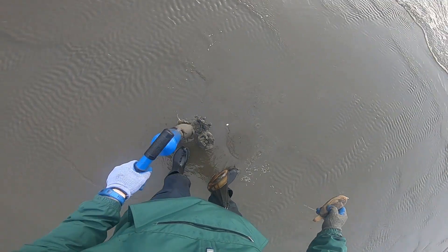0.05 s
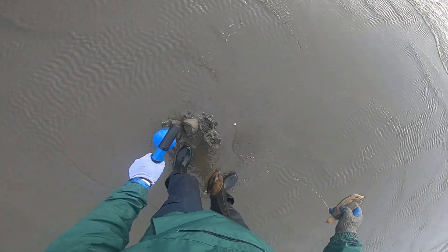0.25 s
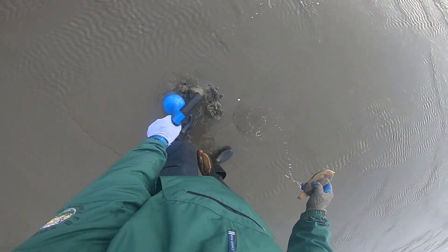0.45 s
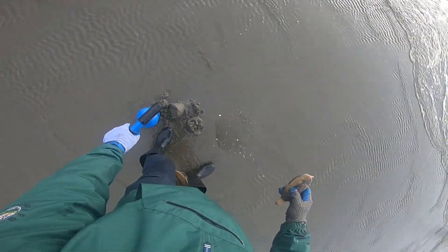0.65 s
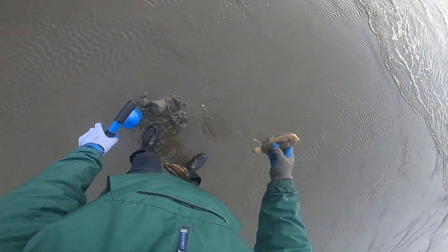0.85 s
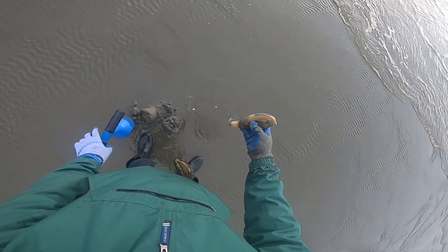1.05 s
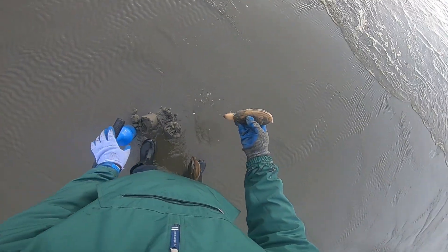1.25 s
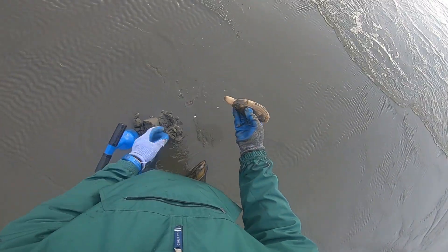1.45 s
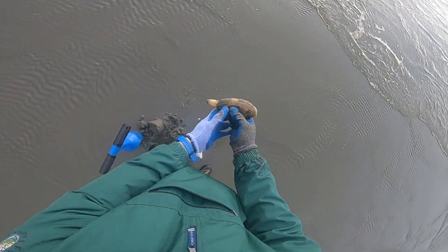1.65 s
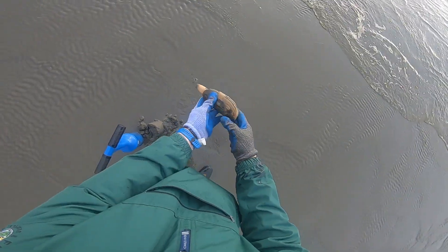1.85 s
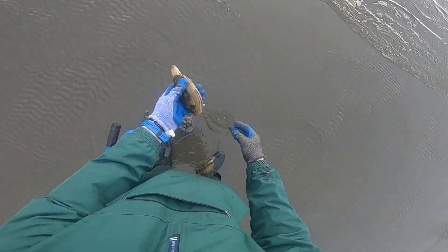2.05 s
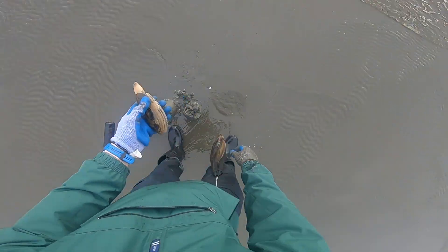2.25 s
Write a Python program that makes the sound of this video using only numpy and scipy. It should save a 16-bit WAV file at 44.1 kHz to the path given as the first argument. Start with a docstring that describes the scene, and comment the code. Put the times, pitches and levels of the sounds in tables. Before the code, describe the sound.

Wet sand squelches close by as a sleeve swishes, with dull bumps and wind buffeting the chest-worn microphone. A few drops tick and plop, then gloves and a sleeve rub softly, while faint surf washes along the beach.

```python
"""Wet sand squelches in swells of tiny pops as a clam digger sets down a tool, an arm's length away.
Tool and shell knock softly, gloves rub as a clam passes from hand to hand, and drops tick and plop.
A sleeve swishes close by, the harness bumps, air buffets the microphone and surf washes behind.
The stereo microphone sits in a chest-worn camera, whose housing rings with sand, knocks, cloth and surf."""
import sys
import numpy as np
from scipy.fft import rfft, irfft
from scipy.io import wavfile
from scipy.ndimage import uniform_filter1d

SR = 44100
rng = np.random.default_rng(int(sys.argv[2]) if len(sys.argv) > 2 else 0)


def waveform_to_disk(signal):
    """Save audio, clipped to [-1, 1], as 16-bit WAV at the path in sys.argv[1]."""
    frames = np.transpose(np.atleast_2d(signal))
    scaled = np.clip(frames, -1, 1) * 32767
    samples = np.round(scaled).astype(np.int16)
    wavfile.write(sys.argv[1], SR, samples)


N = 101429
T = np.arange(N) / SR
HZ = np.maximum(np.fft.rfftfreq(N, 1 / SR), 1)


def from_db(db):
    """Decibels to gain."""
    return 10 ** (np.asarray(db) / 20)


def unit_power(x):
    """Scale to a mean square of 1."""
    return x / np.sqrt(np.mean(x ** 2) + 1e-20)


def level(points):
    """Gain along a (time [s], level [dB]) curve."""
    return from_db(np.interp(T, *np.transpose(points)))


def hump(peak_s, db, width_s):
    """A bell-shaped rise and fall."""
    return from_db(db) * np.exp(-((T - peak_s) / width_s) ** 2 / 2)


def colour(points):
    """Gain along a (frequency [Hz], level [dB]) curve."""
    hz, db = np.transpose(points)
    return from_db(np.interp(np.log(HZ), np.log(hz), db))


def band(hz, width_hz):
    """Gain of one soft band around a pitch."""
    return 1 / (1 + (2 * (HZ - hz) / width_hz) ** 2)


def filtered(x, gain):
    """Apply a gain per frequency."""
    return irfft(rfft(x) * gain, N)


def drift(rate_hz):
    """Slow random wander of unit power."""
    return unit_power(filtered(rng.standard_normal(N), 1 / (1 + (HZ / rate_hz) ** 2)))


def stereo(mid, side, pan_db):
    """Left and right from mid and side; positive pan leans left."""
    return np.array([(mid + side) * from_db(pan_db / 2), (mid - side) * from_db(-pan_db / 2)])


def grains(per_s, spread_db, hiss):
    """Two rows of random tiny clicks over a smooth hiss."""
    sizes = from_db(spread_db * np.minimum(rng.exponential(1, (2, N)), 4))
    clicks = sizes * rng.choice([-1, 1], (2, N)) * (rng.random((2, N)) < per_s / SR)
    return unit_power(unit_power(clicks) + hiss * rng.standard_normal((2, N)))


def rumble(spectrum, side_db, pan_db, even_s=0.056):
    """Low stereo noise of even power."""
    mid, side = filtered(rng.standard_normal((2, N)), colour(spectrum))
    noise = stereo(mid, from_db(side_db) * side, pan_db)
    power = np.mean(noise ** 2, axis=0)
    for _ in range(2):
        power = uniform_filter1d(power, int(even_s * SR))
    return noise / np.sqrt(power)


# Peaks and dips of the housing around the microphone: (frequency [Hz], width [Hz], boost [dB])
HOUSING_MODES = [(822, 226, 11), (1317, 250, 6), (1602, 94, 11.5), (1854, 170, -1), (2160, 180, 3),
                 (2883, 176, 6.5), (3290, 366, 6), (4350, 400, -1.5), (5280, 180, 2), (5600, 480, -0.5),
                 (6470, 680, 4)]
def housing(extra_modes):
    """The camera's shell responds as a chain of resonances."""
    response = 1
    for hz, width_hz, db in [*HOUSING_MODES, *extra_modes]:
        resonance = 1 / (1 + 1j * (HZ ** 2 - hz ** 2) / (HZ * width_hz))
        response = response * (1 + (from_db(db) - 1) * resonance)
    return response


def through_housing(texture, mid_points, side_points, pan_points, lock, extra_modes=()):
    """Colour a texture by source and housing; lock is the side's power share in quadrature with the mid."""
    shell = housing(extra_modes)
    mid_gain, side_gain = colour(mid_points) * shell, colour(side_points) * shell
    mid, diffuse = rfft(texture)
    side = 1j * np.sqrt(lock) * mid + np.sqrt(1 - lock) * diffuse
    channels = stereo(mid * mid_gain, side * side_gain, 20 * np.log10(colour(pan_points)))
    return irfft(channels, N) / np.sqrt(np.mean(abs(mid_gain) ** 2 + abs(side_gain) ** 2))


# Surf, off across the sand: (time [s], level [dB])
SURF_LEVEL = [(0, -56), (.5, -60.5), (.9, -59), (1.3, -59), (1.7, -58.5), (2.05, -57.5), (2.3, -56.5)]
# Its mid, side and left-minus-right spectra: (frequency [Hz], relative level [dB])
SURF_MID = [(40, -10), (100, -8.5), (170, -2), (300, -11.5), (550, -21.5), (1100, -23.5), (1500, -12.5),
            (2000, -22.5), (3000, -23.5), (4000, -27.5), (6200, -30), (8000, -29.5), (12000, -33),
            (15500, -44)]
SURF_SIDE = [(40, -1), (170, -2.5), (300, -7), (520, -12.5), (750, -11), (1100, -12.5), (1500, -11),
             (2100, -24), (3000, -15.5), (4000, -25.5), (6000, -30.5), (9000, -93), (15000, -40)]
SURF_PAN = [(100, -9), (250, -1.5), (950, -1), (1450, 5), (2100, 0.5), (3200, 1), (6000, 0.5)]
def surf(flutter_db=1.0):
    """Small waves wash steadily in the distance."""
    wash = rng.standard_normal((2, N)) * level(SURF_LEVEL) * from_db(flutter_db * drift(25))
    return through_housing(wash, SURF_MID, SURF_SIDE, SURF_PAN, lock=0.26)


# Air right on the microphone: (time [s], relative level [dB])
WIND_LEVEL = [(0, -50), (.06, -67), (.12, -57.5), (.17, -45), (.225, -40.5), (.272, -17.5), (.31, -34.5),
              (.345, -23.5), (.385, -24.5), (.43, -26), (.48, -43.5), (.53, -50), (.575, -38.5),
              (.635, -36), (.69, -55.5), (.76, -36), (.82, -51), (.89, -53), (.95, -61), (1.06, -63.5),
              (1.11, -49), (1.18, -48), (1.22, -62), (1.5, -61.5), (1.55, -53), (1.62, -65.5),
              (1.76, -60.5), (1.8, -50), (1.86, -43), (1.92, -55.5), (1.97, -51), (2.02, -38.5),
              (2.1, -49.5), (2.16, -57.5), (2.26, -38), (2.3, -47.5)]
# Its rumble: (frequency [Hz], relative level [dB])
WIND_SPECTRUM = [(12, -1), (24, 7.5), (38, -3.5), (64, -5), (78, -27.5), (120, -40), (170, -42.5),
                 (300, -56), (700, -99)]
def wind(gain_db=1.5):
    """Air buffets the microphone in low lumps of pressure as the body moves."""
    gusts = uniform_filter1d(level(WIND_LEVEL), size=400) * from_db(gain_db)
    return rumble(WIND_SPECTRUM, side_db=-8, pan_db=-2) * gusts


# Bumps at the camera mount: (peak time [s], level [dB], width [s])
HARNESS_BUMPS = [(.243, -47, 0.0063), (0.296, -35.5, 0.014), (.347, -37.5, 0.0093), (0.384, -28, .011),
                 (.455, -46, 0.019), (.53, -63, 0.028), (.605, -59, 0.016), (1.15, -63, 0.0059),
                 (1.856, -56.5, 0.01), (1.99, -66, 0.02), (2.265, -54.5, 0.027)]
# Their thud: (frequency [Hz], relative level [dB])
BUMP_SPECTRUM = [(40, 0), (70, 10.5), (100, -3.5), (125, 5.5), (170, -23.5), (260, -25.5), (400, -27),
                 (800, -71)]
def harness_bumps():
    """The body bumps dully against the camera harness."""
    return rumble(BUMP_SPECTRUM, side_db=-2, pan_db=-8) * sum(hump(*row) for row in HARNESS_BUMPS)


def fibres(catch_db=0.85):
    """Threads of cloth catch and slip."""
    return grains(per_s=4000, spread_db=0, hiss=1.6) * from_db(catch_db * drift(66))


# Sleeve on the chest, beside the microphone: (time [s], level [dB])
RUB_LEVEL = [(0, -72.5), (.2, -70), (.5, -65.5), (.64, -71.5), (.72, -77.5), (1.38, -81), (1.5, -70),
             (1.6, -64.5), (1.72, -63), (1.92, -61), (2.0, -64.5), (2.07, -76), (2.3, -77)]
# Its mid, side and left-minus-right spectra: (frequency [Hz], relative level [dB])
RUB_MID = [(500, -26), (1500, 4.5), (2500, -5), (4000, -2), (6300, 4.5), (8000, 0), (10000, -7),
           (14000, -33)]
RUB_SIDE = [(500, 0), (1500, 5.5), (3000, 1), (4500, 0), (6300, -0.5), (8000, -48), (14000, -40)]
RUB_PAN = [(1000, 3.5), (1500, 2.5), (4200, -1.5), (5900, 7.5), (7500, -2.5), (12000, 3.5)]
# Ring of the lightly rubbed housing: (frequency [Hz], width [Hz], boost [dB])
RUBBED_MODES = [(5250, 220, 2.5), (8140, 2300, 0.5)]
# Notes of the sliding weave: (peak time [s], pitch [Hz], bandwidth [Hz], level [dB], width [s])
WEAVE_NOTES = [(1.715, 8000, 2200, -75, 0.065), (1.855, 6300, 380, -72, .07)]
def sleeve_rub():
    """The arm crosses the chest in a long light rub; the weave sings airily, then in a thin zip."""
    friction = fibres() * level(RUB_LEVEL)
    rub = through_housing(friction, RUB_MID, RUB_SIDE, RUB_PAN, lock=0, extra_modes=RUBBED_MODES)
    for peak_s, hz, width_hz, db, width_s in WEAVE_NOTES:
        mid, side = filtered(fibres(), band(hz, width_hz))
        note = unit_power(stereo(mid, from_db(-11) * side, pan_db=5))
        rub += note * hump(peak_s, db, width_s)
    return rub


# Sleeve brushing past the microphone: (time [s], level before dulling [dB])
SWISH_LEVEL = [(0, -86), (.2, -82), (.252, -56), (.263, -50.5), (.285, -45.5), (.345, -49.5), (.395, -51),
               (.43, -69), (.6, -59), (.7, -82), (.85, -81)]
# Its mid, side and left-minus-right spectra: (frequency [Hz], relative level [dB])
SWISH_MID = [(150, -22), (500, -22), (950, -13.5), (1300, -3), (1700, -6.5), (2500, -12.5), (4000, -12),
             (7000, -9), (10000, -17), (12000, -31), (14000, -51)]
SWISH_SIDE = [(150, 15.5), (500, -11), (950, -12), (1300, 3.5), (1700, -10), (2400, -6), (3100, -6),
              (4500, -9), (6500, -16), (9000, -26), (14000, -80)]
SWISH_PAN = [(300, -2.5), (1400, 0.5), (2200, 8), (3100, -8.5), (4200, 5.5), (5900, 10.5), (8000, 0),
             (12000, 2)]
# Ring of the brushed housing: (frequency [Hz], width [Hz], boost [dB])
BRUSHED_MODES = [(1280, 310, 2), (3250, 170, 6.5), (4350, 770, 0.5), (5200, 170, 7), (5700, 420, -1)]
def sleeve_swish(slow_from_s=0.29, slowing_s=0.16, dull_hz=3600):
    """One quick stroke of cloth, bright at first and duller as the arm slows."""
    stroke = fibres() * level(SWISH_LEVEL)
    bright = through_housing(stroke, SWISH_MID, SWISH_SIDE, SWISH_PAN,
                             lock=0.27, extra_modes=BRUSHED_MODES)
    dull = filtered(bright, 1 / (1 + (HZ / dull_hz) ** 4))
    slowed = np.clip((T - slow_from_s) / slowing_s, 0, 1)
    return bright + slowed * (dull - bright)


# Drops and grit, near and central: (peak time [s], pitch [Hz], bandwidth [Hz], level [dB], width [s])
DROP_TICKS = [(0.054, 3260, 350, -62.5, 0.0026), (.055, 5700, 2000, -65.5, 0.0011),
              (0.0575, 9000, 1600, -65.5, .0008), (.108, 6800, 500, -72, 0.0012),
              (.163, 6240, 1500, -80, .0015), (.2635, 6550, 900, -60.5, 0.0025),
              (.49, 6100, 1000, -63.5, 0.0016), (0.597, 7100, 2500, -69, .002),
              (.652, 6100, 600, -70, 0.0018), (.893, 6200, 900, -74, 0.0016),
              (1.058, 6370, 900, -78, .0015)]
def drop_ticks():
    """Water and grit land in short ticks of noise, each around its own pitch."""
    ticks = 0
    for peak_s, hz, width_hz, db, width_s in DROP_TICKS:
        mid, side = filtered(rng.standard_normal((2, N)), band(hz, width_hz))
        envelope = hump(peak_s, 0, width_s)
        tick = stereo(mid, from_db(-10) * side, pan_db=0) * envelope
        ticks += from_db(db) * unit_power(tick) * np.sqrt(np.mean(envelope ** 2))
    return ticks


# Drops landing nearby: (time [s], pitch [Hz], level before the attack ramp [dB], decay [s])
DROP_PLOPS = [(0.712, 1290, -40.5, 0.0054), (1.192, 1520, -44.5, 0.0028)]
def drop_plops(attack_s=0.0029):
    """Each landing drop rings for a few cycles."""
    plops = 0
    for start_s, hz, db, decay_s in DROP_PLOPS:
        age = np.maximum(T - start_s, 0)
        envelope = (1 - np.exp(-age / attack_s)) * np.exp(-age / decay_s)
        plops += from_db(db) * np.sin(2 * np.pi * hz * age) * envelope
    return plops


# Gloves in front of the chest, to the right: (peak time [s], level [dB], width [s])
GLOVE_RUBS = [(1.013, -58.5, 0.027), (1.145, -66, 0.013), (1.854, -60.5, 0.016), (1.995, -60, 0.017)]
# Their low tone: (frequency [Hz], relative level [dB])
GLOVE_SPECTRUM = [(90, -10), (150, 5), (250, -6.5), (400, -21), (900, -57)]
def glove_rubs():
    """Gloves rub hollowly on handle and shell."""
    return rumble(GLOVE_SPECTRUM, side_db=-2, pan_db=-6) * sum(hump(*row) for row in GLOVE_RUBS)


# Tool and shell at arm's length: (time [s], level [dB], decay [s])
TOOL_KNOCKS = [(.258, -41.5, 0.0015), (.462, -43, 0.0012)]
# Their tone, in mid and side alike: (frequency [Hz], relative level [dB])
KNOCK_SPECTRUM = [(200, -4), (700, -8), (1400, 3), (2200, -17), (4000, -27), (9000, -35), (14000, -37)]
# Balance of the digging spot, for knocks and sand: (frequency [Hz], left minus right [dB])
DIG_PAN = [(200, -9.5), (500, -0.5), (900, -3.5), (1450, 1.5), (2200, 4), (3200, 0), (5000, -5)]
DIG_LOCK = 0.94
def tool_knocks():
    """Tool and shell knock softly: sudden bursts of noise that die away."""
    envelope = sum(from_db(db) * (T >= start_s) * np.exp(-abs(T - start_s) / decay_s)
                   for start_s, db, decay_s in TOOL_KNOCKS)
    knocks = rng.standard_normal((2, N)) * envelope
    return through_housing(knocks, KNOCK_SPECTRUM, KNOCK_SPECTRUM, DIG_PAN, DIG_LOCK)


# Wet sand just below the microphone: (peak time [s], level [dB], attack [s], decay [s])
SAND_SQUELCHES = [(0.393, -36, 0.014, 0.026), (0.459, -46, 0.013, 0.027), (0.559, -46, 0.026, 0.029),
                  (.716, -53, 0.032, 0.009)]
# Its mid and side spectra: (frequency [Hz], relative level [dB])
SAND_MID = [(100, -2), (250, -7), (550, -9), (850, -16), (1050, -5), (1350, -3.5), (1650, -13.5),
            (2100, -13.5), (3000, -22.5), (5000, -37), (10000, -62)]
SAND_SIDE = [(100, 6.5), (280, -5), (620, 2.5), (850, -10.5), (1050, 2), (1400, 3.5), (1900, -18),
             (3000, -20), (5000, -40), (10000, -76)]
def wet_sand():
    """Each squelch is a swell of tiny wet pops."""
    swell = 0
    for peak_s, db, attack_s, decay_s in SAND_SQUELCHES:
        age = T - peak_s
        swell += from_db(db) * np.exp(np.where(age < 0, -(age / attack_s) ** 2 / 2, -age / decay_s))
    pops = grains(per_s=3300, spread_db=3, hiss=0.55)
    return through_housing(pops * swell, SAND_MID, SAND_SIDE, DIG_PAN, DIG_LOCK)


def scene():
    """The shore as heard from the digger's chest."""
    background = surf() + wind() + harness_bumps()
    digging = glove_rubs() + tool_knocks() + wet_sand()
    return background + digging + sleeve_swish() + sleeve_rub() + drop_ticks() + drop_plops()


def record(dry, cutoff_hz=15600):
    """The camera cuts the top treble steeply."""
    return filtered(dry, 1 / np.sqrt(1 + np.minimum(HZ / cutoff_hz, 1.2) ** 400))


dry = scene()
out = record(dry)
waveform_to_disk(out)
```